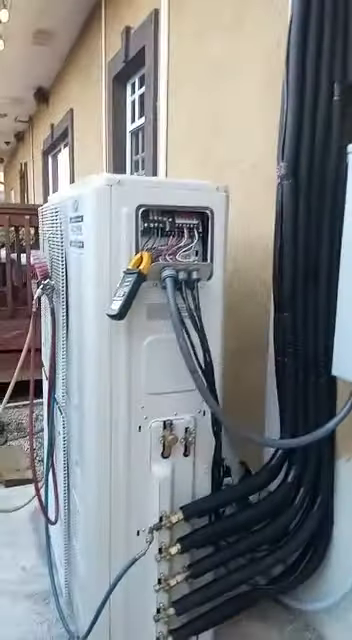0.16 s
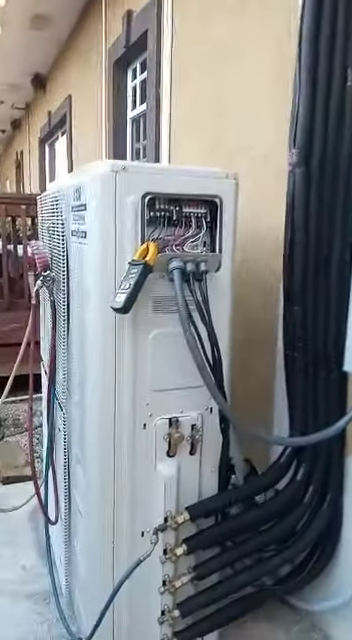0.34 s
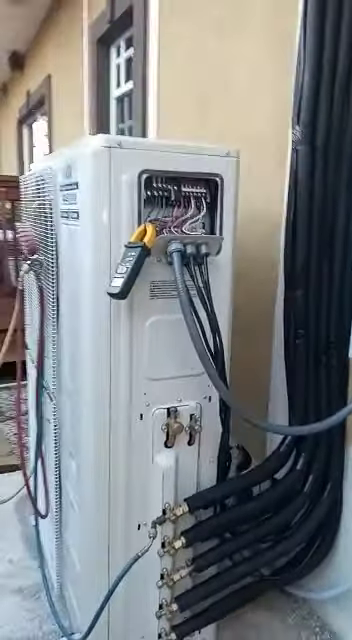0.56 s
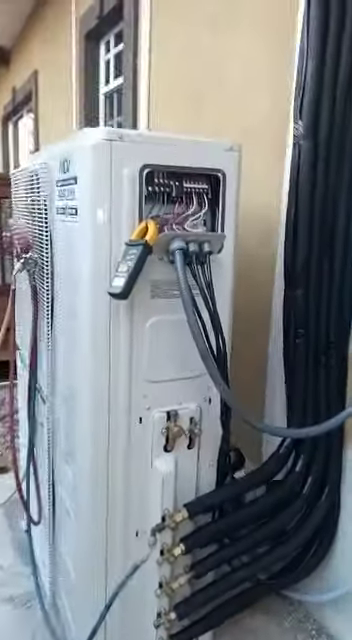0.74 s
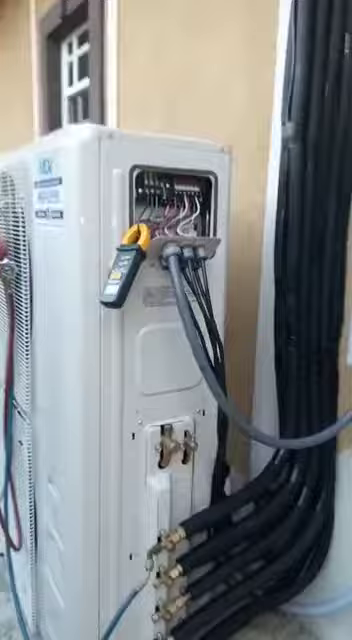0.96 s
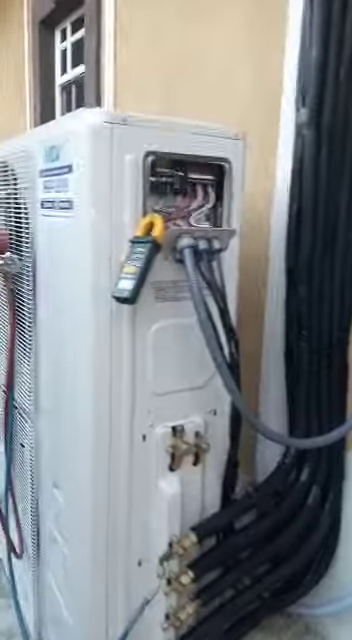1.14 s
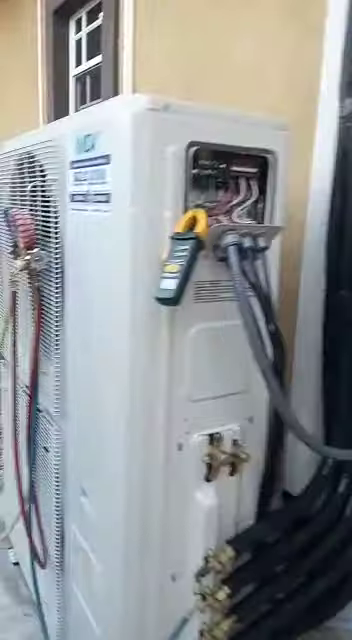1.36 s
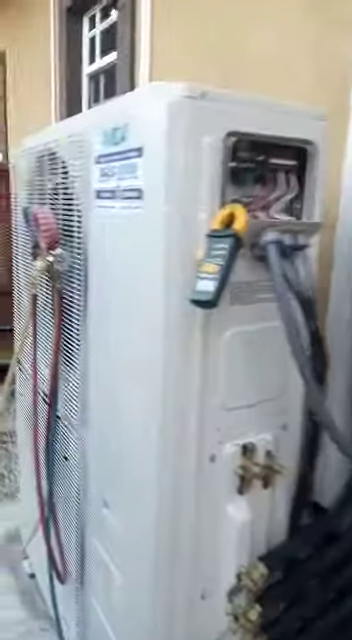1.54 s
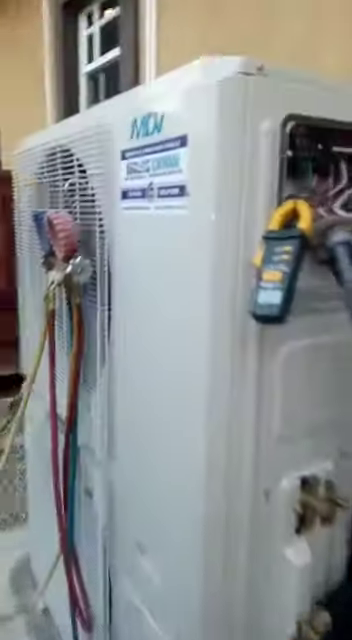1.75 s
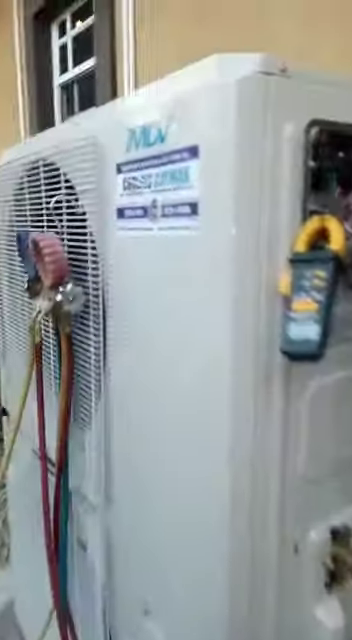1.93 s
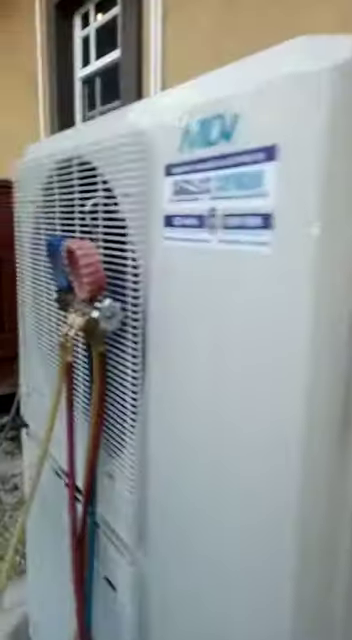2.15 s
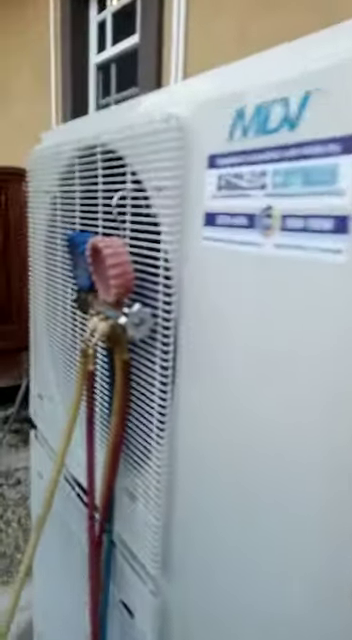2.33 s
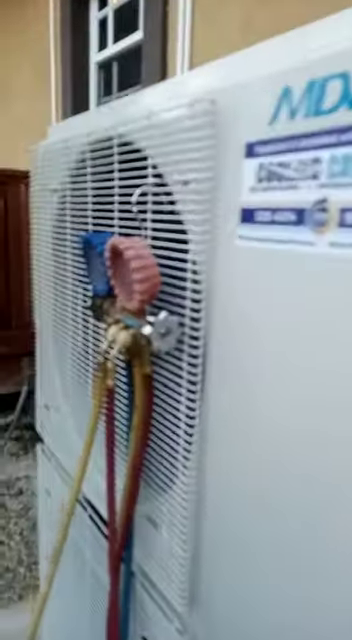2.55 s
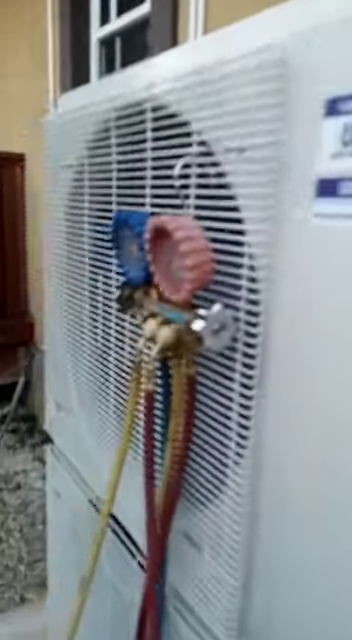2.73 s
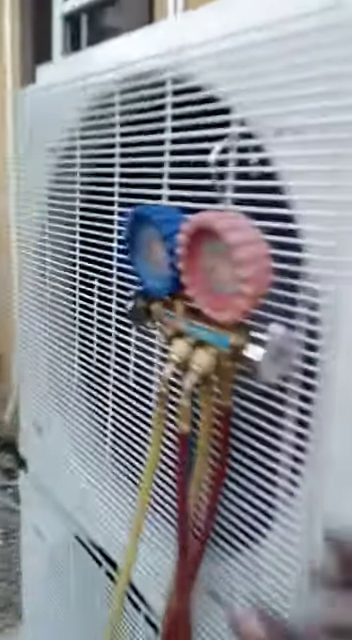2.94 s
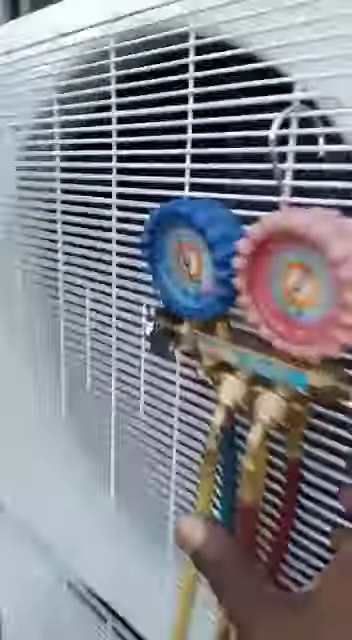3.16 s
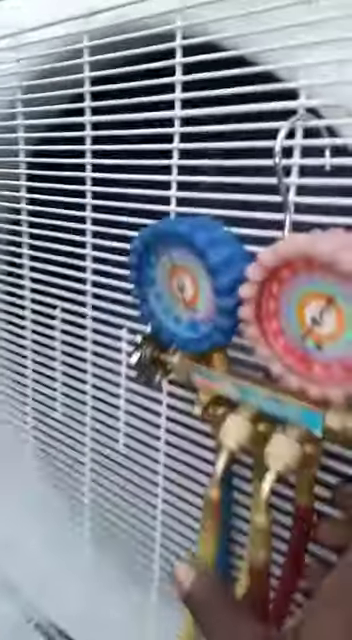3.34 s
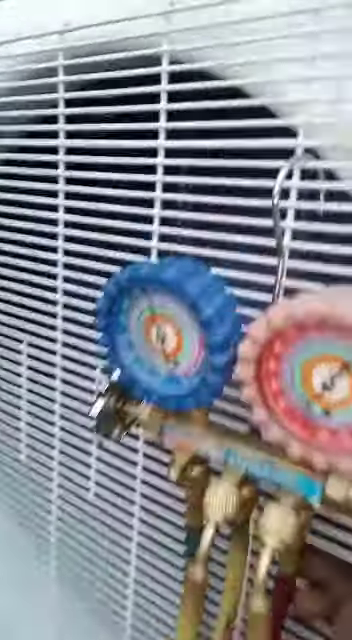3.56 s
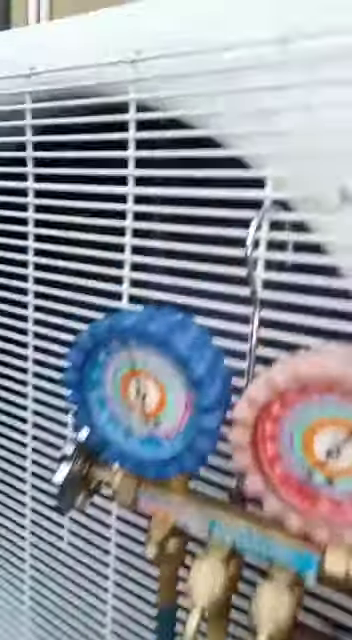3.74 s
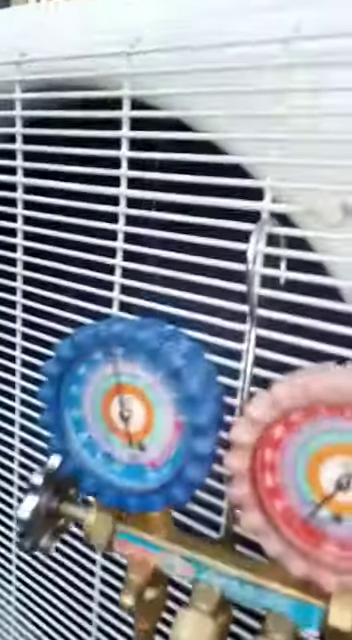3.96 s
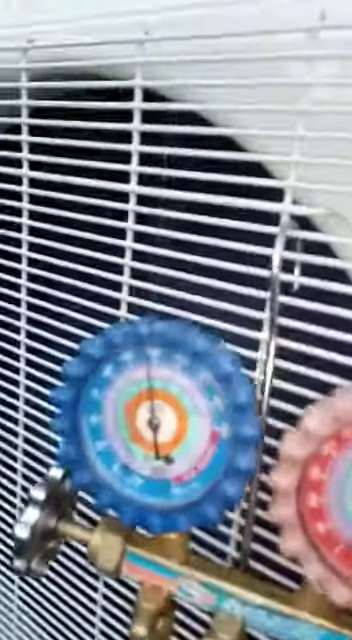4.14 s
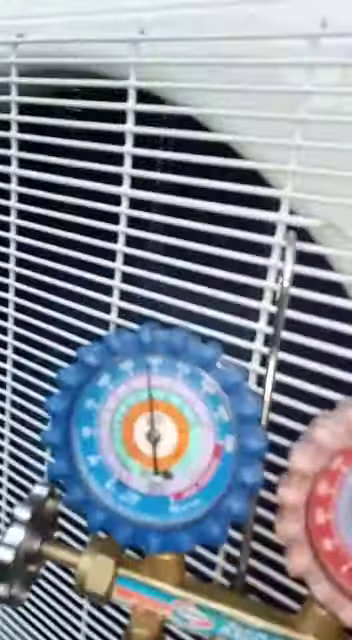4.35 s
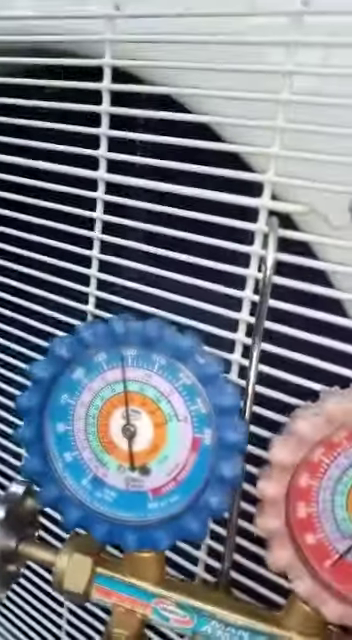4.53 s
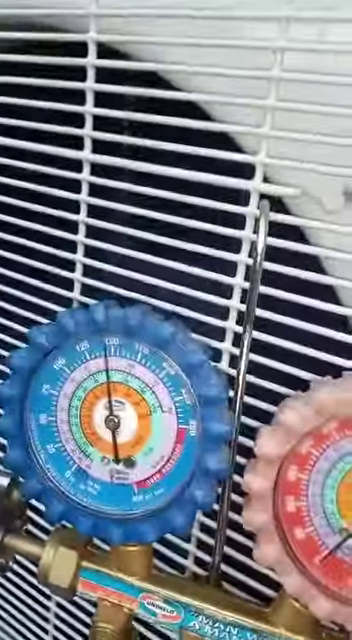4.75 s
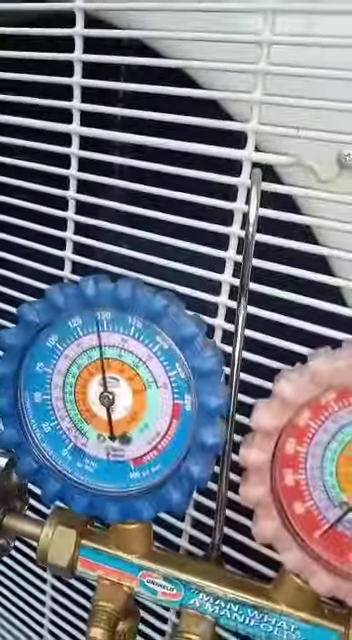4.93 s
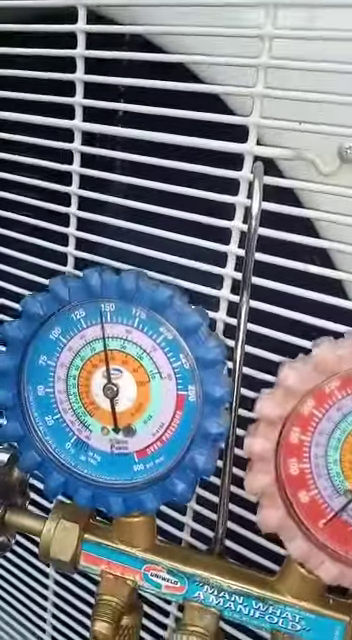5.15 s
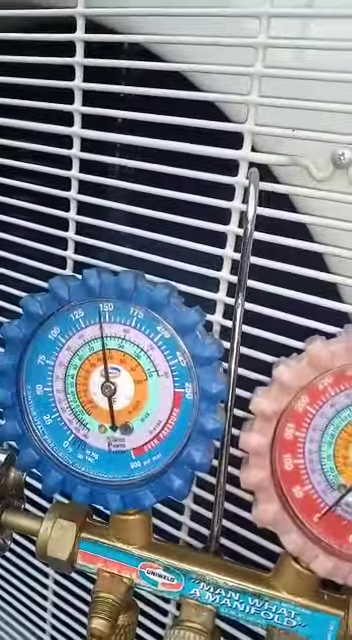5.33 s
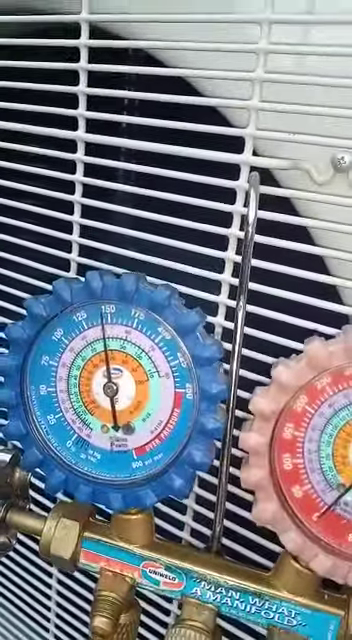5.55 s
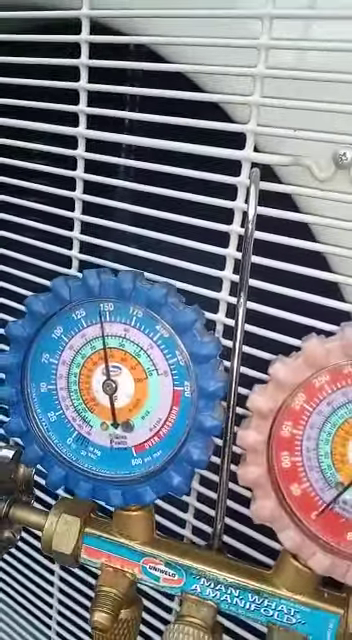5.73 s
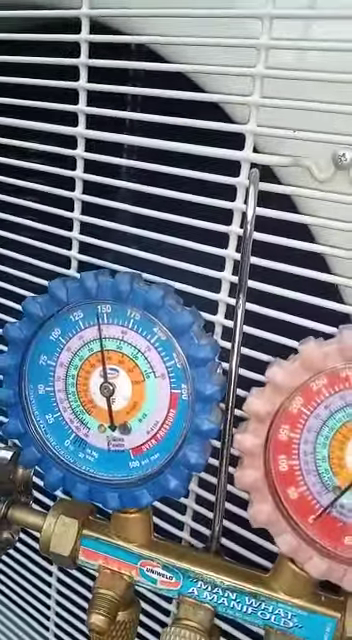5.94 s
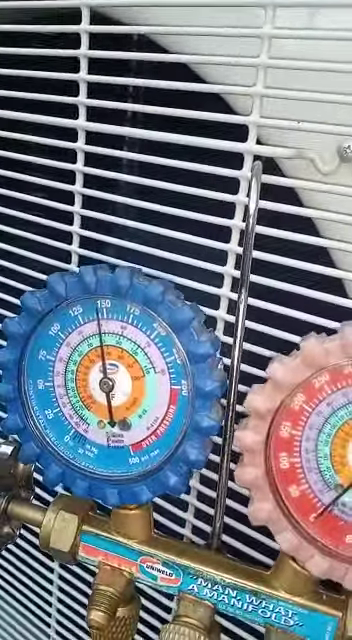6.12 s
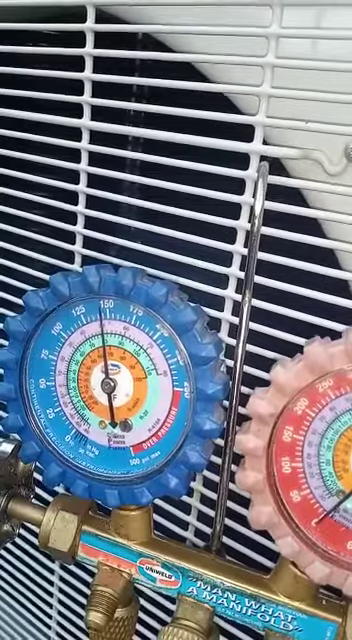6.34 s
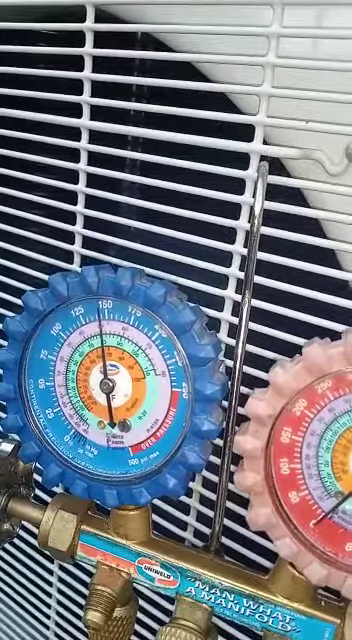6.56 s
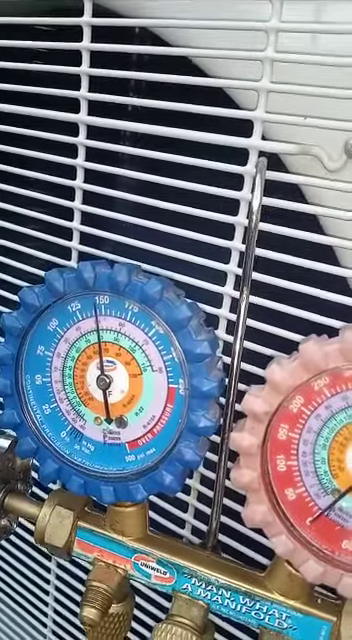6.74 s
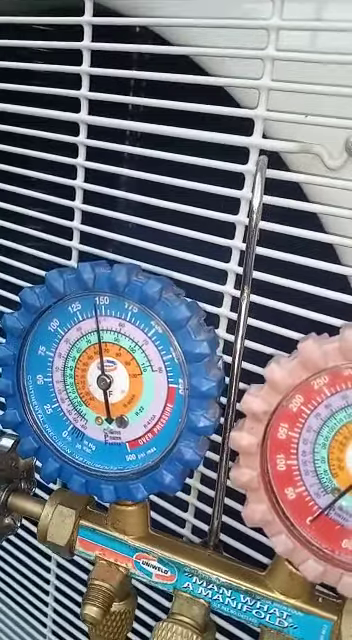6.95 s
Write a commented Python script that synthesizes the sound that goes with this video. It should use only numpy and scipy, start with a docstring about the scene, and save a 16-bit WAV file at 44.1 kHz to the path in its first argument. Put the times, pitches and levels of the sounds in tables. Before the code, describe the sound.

An outdoor air conditioner hums and hisses steadily, then its fan outflow buffets the microphone with rumbling, thumping gusts as it comes close.

```python
"""The outdoor unit of an air conditioner runs steadily while a two-port hand-held microphone walks up to its fan.
Casing hiss and a whine band are filtered noise; compressor orders, fan tones and whistle are fading sines.
In the outflow, eddies buffet each port on its own: a frozen noise pattern is swept past at the air's speed.
A gain control ducks the machine under the gusts."""
import sys
import numpy as np
from scipy import signal
from scipy.fft import rfft, irfft, next_fast_len
from scipy.io import wavfile
from scipy.ndimage import uniform_filter1d, map_coordinates

SR = 44100
rng = np.random.default_rng(int(sys.argv[2]) if len(sys.argv) > 2 else 0)


def master(y):
    """Save y as 16-bit WAV."""
    cut = np.clip(np.atleast_2d(y).T, -1, 1)
    pcm = np.round(cut * 32767)  # scale
    wavfile.write(sys.argv[1], SR, pcm.astype(np.int16))


def boost(x):
    """Linear amplitude factor 10**(x/20) for a level x in decibels (scalar or array-like)."""
    u = np.asarray(x, float) / 20
    return 10 ** u


N = 308259  # length [samples]


def evened(x):
    """Normalization: divides a signal by its root-mean-square value."""
    return x / np.sqrt(np.mean(x ** 2) + 1e-20)


def read(points, hz):
    """Spectral interpolation: reads a table against the logarithm of frequency."""
    f, value = np.transpose(points)
    return np.interp(np.log(hz + 1), np.log(f + 1), value)


def curves(rows):
    """Envelope interpolation: turns each column of a timed table into one value a sample."""
    s, *columns = np.transpose(rows)
    return [np.interp(np.arange(N) / SR, s, column) for column in columns]


def wander(low_hz, top_hz):
    """Superposition: log-spaced sines of random phase add up to a slow fluctuation of rms 1."""
    t = np.arange(0, N + 64, 64) / SR
    slow = sum(np.sin(2 * np.pi * (f * t + rng.random())) for f in np.geomspace(low_hz, top_hz, num=24))
    return np.interp(np.arange(N) / SR, t, evened(slow))


def low_cut(x):
    """High-pass response: the ports lose the deep bass."""
    return signal.sosfilt(signal.butter(4, 92.3, "high", fs=SR, output="sos"), x)


def patchy_noise(gain, patchy_db):
    """Partial coherence: two noises share a part at each frequency, under drifting spectral patches."""
    # likeness of the ports apart from the lag: (frequency [Hz], coherence [0-1])
    alike = [(60, 0), (300, 1), (800, 0.4), (1500, 0), (4000, 0.52), (15000, 0.3)]
    frames, hz = N // 512 + 5, np.fft.rfftfreq(2048, 1 / SR)
    a, b, c, d, patches = rng.standard_normal((frames, 1025, 5)).T
    patches = uniform_filter1d(patches, size=8, axis=0)  # along frequency
    patches = evened(uniform_filter1d(patches, size=20, axis=1))  # along time
    same = np.clip(read(alike, hz), 0, 1)[:, None]
    left, other = a + 1j * b, c + 1j * d
    spectra = np.array([left, same * left + np.sqrt(1 - same ** 2) * other])
    spectra *= gain(hz)[:, None] * boost(patchy_db * patches)
    return evened(signal.istft(spectra, nperseg=2048, noverlap=1536)[1][:, :N])


def unit():
    """Diffraction and path delay: the machine is shaded at the right port and late at the left."""
    # the right port faces away from the unit: (frequency [Hz], attenuation at the right port [dB])
    shade = [(60, 17), (200, 2.5), (700, 2.5), (1300, 7), (2400, 11.5), (5500, 13.5), (6800, 16),
             (8400, 34), (9600, 3), (11500, 3), (14000, -6), (15700, 10)]
    lag_s = 0.000755
    size = next_fast_len(N)
    hz = np.fft.rfftfreq(size, 1 / SR)
    ports = np.array([np.exp(-2j * np.pi * hz * lag_s), boost(-read(shade, hz))])
    machine = casing_hiss() + whine() + tones()
    return low_cut(irfft(rfft(machine, size) * ports, size)[:, :N])


def casing_hiss():
    """Broadband flow noise: airflow and casing hiss, its top dulling as the ports turn to the grille."""
    # relative spectrum of the hiss: (frequency [Hz], spectral density [dB])
    hiss_shape = [(60, -4), (150, -3), (300, -9), (600, -12), (1050, -14), (1500, -11), (2000, -16),
                  (4300, -17), (5600, -21), (9300, -24), (12400, -28), (13800, -45), (14900, -23),
                  (15700, -25)]
    # gain of the top band: (time [s], gain [dB])
    dulling = [(0, -1), (2.5, 0.5), (3.6, -5.5), (6.99, -5)]
    hiss = boost(-25) * patchy_noise(lambda hz: boost(read(hiss_shape, hz)), patchy_db=1.0)
    band = signal.butter(2, [9000, 13800], "band", fs=SR, output="sos")
    top = signal.sosfiltfilt(band, hiss)
    return hiss + top * (boost(curves(dulling)[0]) - 1)


def whine():
    """Band-limited noise: the compressor drive hisses in a cluster of spectral humps."""
    # humps of the whine ahead of its gain curve: (centre [Hz], width [Hz], rms level [dB])
    hump_rows = [(6167, 230, -34.5), (6420, 26, -35), (6620, 510, -32), (6926, 48, -35.5), (7180, 460, -29),
                 (7425, 610, -34.5)]
    # the whine is loudest at the corner of the unit: (time [s], gain [dB])
    whine_gain = [(0, -2), (2.0, 3), (3.2, -3), (6.99, -3)]

    def humps(hz):
        power = sum(boost(2 * db) / w / (1 + (2 * (hz - f) / w) ** 4) for f, w, db in hump_rows)
        return np.sqrt(power)

    total = np.sqrt(sum(boost(2 * db) for f, w, db in hump_rows))
    return total * patchy_noise(humps, patchy_db=3.5) * boost(curves(whine_gain)[0])


def tones():
    """Harmonic orders of rotation: compressor shaft orders, the fan's tones and its drive's whistle."""
    # compressor orders, ahead of crests and fades: (multiple of the shaft rate [1], rms level [dB])
    orders = [(4, -47), (6, -51), (9, -45), (10, -49), (11, -54), (13, -54), (17, -52), (19, -45),
              (20, -48), (21, -45), (23, -51), (36, -54), (37, -55), (40, -53), (42, -54), (44, -54),
              (47, -57), (50, -57), (55, -56), (73, -53), (79, -45), (82, -49), (85, -42), (97, -46)]
    # fan blade-pass tones, ahead of the approach gain and fades: (frequency [Hz], rms level [dB])
    fan_tones = [(80, -41), (119, -36), (160, -33), (200, -44)]
    # growth of the fan's tones on the way to the grille: (time [s], gain [dB])
    fan_near = [(0, -5), (.9, -6.5), (1.3, 0.5), (2.5, 1.5), (6.99, 2)]
    # the fan drive's thin top whistle: (frequency [Hz], ..)
    whistle_hz = (14891, 14998, 15104)
    # each whistle line ahead of fades, clearer in front of the grille: (time [s], rms level [dB])
    whistle = [(0, -66), (3.6, -62), (4.2, -54), (5.5, -55), (6.99, -60)]
    shaft_hz = 76.01
    tremor = np.array([wander(0.306, 9) for port in range(2)])
    whistle_db = curves(whistle)[0]
    near_db = curves(fan_near)[0]
    out = sum(tone(k * shaft_hz, order_db(k, db), 1.5, tremor) for k, db in orders)
    out += sum(tone(hz, whistle_db, 3, tremor) for hz in whistle_hz)
    return out + sum(tone(hz, db + near_db, 1.8, tremor) for hz, db in fan_tones)


def order_db(k, db):
    """Standing waves beside the wall: an order swells as the listener walks through a crest."""
    # crests, added by power: (shaft multiple [1], time [s], 1/e half-width [s], rms level [dB])
    crest_rows = [(9, .45, .35, -41), (23, .45, .5, -42), (19, 1.0, .22, -36), (10, 1.1, .45, -44),
                  (4, 1.9, .9, -41), (50, 1.75, .15, -44), (55, 2.0, .3, -47), (19, 2.9, .3, -39),
                  (9, 2.0, .35, -42), (19, 2.05, .35, -35), (44, 2.1, .3, -39), (21, 2.25, .35, -40),
                  (23, 2.15, .25, -46), (21, 3.1, .25, -38), (19, 5.0, .2, -36), (19, 5.5, .12, -39)]
    t = np.arange(N) / SR
    crests = sum(boost(2 * top_db) * np.exp(-((t - s) / width) ** 2)
                 for at, s, width, top_db in crest_rows if at == k)
    return 10 * np.log10(boost(2 * db) + crests)


def tone(hz, db, fade_db, tremor):
    """Amplitude and phase modulation: a sine fades at each port; hand tremor shakes high tones' phase most."""
    cycles = hz * np.arange(N) / SR + rng.random((2, 1))
    phase = 2 * np.pi * cycles + min(hz / 2500, .75) * tremor
    # the right port is 3.5 dB weaker
    fades_db = np.array([db - 3.5 * port + fade_db * wander(0.168, 6) for port in range(2)])
    return boost(fades_db) * np.sqrt(2) * np.sin(phase)


def buffet(port, breeze_db, eddy_m=0.011, gusty=.4, lumpy_db=4.0):
    """Frozen turbulence: an eddy pattern is swept past the port, so quicker air sounds brighter."""
    level_db, speed, gusting = air(port, breeze_db)
    surge, lull_db, swings = bursts(port, level_db, speed, gusting)
    gust = 1.8 * np.tanh(wander(8, 110) / 1.6)
    metres = np.cumsum(speed * np.exp(gusty * gust + .5 * surge)) / SR
    step_m = .0004
    count = int(metres[-1] / step_m) + 9
    per_m = np.fft.rfftfreq(count, step_m) + 0.00075
    # big eddies are strong, those under the smallest size are smoothed away
    sizes = per_m ** -.6 / (1 + (per_m * eddy_m) ** 2.46)
    pattern = irfft(rfft(rng.standard_normal(count)) * sizes, count)
    swept = low_cut(map_coordinates(pattern, [metres / step_m], order=3))
    # divide out the running rms, then set the level anew
    steady = swept / np.sqrt(uniform_filter1d(swept ** 2, size=5000) + 1e-20)
    lumps = evened(boost(lumpy_db * (0.16 * gust + 0.88 * wander(5, 35))))
    return boost(level_db + lull_db) * steady * lumps + .7 * low_cut(swings)


def air(port, breeze_db):
    """Power addition: gusts add to a restless breeze, and the air speed is their power-weighted mean."""
    # gusts of outflow that sweep one port:
    # (start [s], time from start to fall [s], port, level [dB], air speed ahead of fluctuation [m/s])
    gust_rows = [(.09, .05, "right", -35, 1.0), (0.232, 0.16, "right", -35, 1.13),
                 (0.573, 0.048, "right", -33, 1.0), (1.65, 0.15, "left", -30, 1.23),
                 (2.14, 0.081, "left", -29, 1.03), (2.659, 0.097, "right", -4, 1.99),
                 (2.779, 0.17, "left", -9, 1.75), (2.84, 0.094, "right", -6, 1.59),
                 (2.998, 0.3, "left", -8, 2.3), (3.079, 0.082, "right", -8, 1.4),
                 (3.389, .27, "left", -5.5, 1.94), (3.53, 0.28, "right", -5, 3.55),
                 (3.78, 0.082, "left", -7, 1.41), (3.899, 0.17, "right", -9.5, 3.03),
                 (4.3, 0.33, "left", -11, 1.495), (4.698, 0.1, "right", -6, 4.9),
                 (4.998, 0.26, "right", -7, 3.53), (5.31, .28, "right", -8, 2.9),
                 (5.42, 0.23, "left", -13.5, 1.63), (5.608, .22, "right", -2, 4.77),
                 (5.831, .16, "left", -12, 1.8), (5.928, .04, "right", -5.5, 2.2),
                 (6.0, 0.077, "right", -3, 4.6), (6.08, 0.19, "left", -11.5, 2.23),
                 (6.172, .06, "right", -6.5, 2.48), (6.301, 0.058, "right", -5, 3.07),
                 (6.408, .26, "right", -3, 4.2), (6.73, 0.23, "left", -7.5, 2.2),
                 (6.856, .13, "right", -9.5, 4.86)]
    rise_s, fall_s = .015, .03
    t = np.arange(N) / SR
    breeze = boost(2 * (breeze_db + 1.21 * wander(2.5, 9)))
    # 1.8 m/s at -15 dB and 0.14 m/s more for each dB, at least 0.5 m/s
    breeze_speed = np.maximum(1.8 + 0.14 * (breeze_db + 15), .5)
    gusts, moved = np.zeros(N), breeze * breeze_speed
    for s, length, at_port, db, speed in gust_rows:
        if at_port == port:
            ramp = np.minimum((t - s) / rise_s, (s + length - t) / fall_s + 1).clip(0, 1)
            power = boost(2 * db) * ramp ** 2
            gusts = gusts + power
            moved = moved + power * speed
    return 10 * np.log10(breeze + gusts), moved / (breeze + gusts), gusts > breeze


def bursts(port, level_db, speed, gusting):
    """Impulsive pressure: each knock is a surge of air speed, a level change ahead and one pressure swing."""
    # the sharpest knocks of air; the swing is later scaled and low-cut, a positive change is a swell:
    # (time [s], port, relative swing level [dB], relative level change just before [dB])
    pops = [(3.051, "left", -2, -4), (3.254, "left", 7, -1), (3.281, "left", 6, 0), (3.47, "left", 6, -4.5),
            (3.537, "right", 1, -1), (3.641, "right", 4.5, -5), (3.722, "right", 5.5, 1),
            (3.766, "right", 9, -6), (4.039, "right", 6.5, -3), (4.335, "left", 3.5, -2.5),
            (4.717, "right", 10.5, -5), (4.778, "right", 5, -7), (5.185, "right", 2.5, -2.5),
            (5.25, "right", -3, 2), (5.517, "right", 3, -4), (5.618, "right", 5.5, -6),
            (5.651, "right", 12, 1.5), (5.712, "right", 14, 1), (5.769, "right", 2.5, -1.5),
            (5.818, "right", -3, -0.5), (6.0, "right", 5, -11), (6.062, "right", 12.5, -11),
            (6.305, "right", 4, 1), (6.365, "right", 5, 2.5), (6.411, "right", 14, -13),
            (6.484, "right", 12, -4), (6.507, "right", 7, 3.5), (6.544, "right", 7.5, 1),
            (6.641, "right", 7.5, -2), (6.741, "left", 6, -5.5), (6.76, "left", 5, -0.5),
            (6.88, "right", 9.5, -3)]
    knocks_per_s, knock_over_db = 4, 5  # small random knocks inside gusts
    surge, lull_db, swings = np.zeros(N), np.zeros(N), np.zeros(N)
    t = np.arange(N) / SR
    small = np.flatnonzero((rng.random(N) < knocks_per_s / SR) & gusting & (t < t[-2300]))
    knocks = pops + [(t[i], port, level_db[i] + knock_over_db, 0) for i in small]
    chance = rng.random((200, 2))
    for (s, at_port, db, before_db), (pitch, side) in zip(knocks, chance):
        if at_port == port:
            centre = round(s * SR)
            near = slice(centre - 2200, centre + 2200)
            u = t[near] - s
            surge[near] += (u > -.002) * np.exp(-abs(u) / .008)
            # a 42 ms trapezoid with a plateau of 1.11 times before_db
            lull_db[near] += before_db * np.minimum(-u - .002, u + 0.0444).clip(0, .004) / 0.0036
            # quicker air makes a shorter swing
            turns = (u - .0015) * (300 + 90 * pitch) * speed[centre] ** .33
            swing = np.cos(2 * np.pi * turns) * np.exp(-(turns / 0.49) ** 2)
            swings[near] += boost(db) * np.sign(side - .5) * swing
    return surge, lull_db, swings


def scene():
    """Superposition: the unit's sound adds to the air's pressure on each port."""
    # the breeze, weak beside the unit, strong in the outflow, ahead of its restless fluctuation:
    # (time [s], left level [dB], right level [dB])
    breeze = [(0.0, -46, -46), (1.4, -48, -44), (2.0, -38, -35), (2.5, -27.5, -31), (2.58, -13, -18),
              (3.3, -12, -15), (4.2, -15, -16), (4.8, -14, -26), (5.15, -21, -16), (5.9, -18, -17),
              (6.65, -23.5, -17), (6.99, -18, -16.5)]
    left_db, right_db = curves(breeze)
    return unit() + np.array([buffet("left", left_db), buffet("right", right_db)])


def low_pass(x):
    """Removes everything above the highest recorded frequency."""
    return signal.sosfilt(signal.butter(12, 17070, fs=SR, output="sos"), x)


def record(dry):
    """Dynamic compression: linked gain follows the louder port; a soft ceiling and a low-pass follow."""
    louder = uniform_filter1d(dry ** 2, size=1000, axis=1).max(0)
    power_db = 10 * np.log10(louder.clip(1e-12))
    # the detector rises with the power and falls by at most 176 dB/s
    fall = np.arange(N) * 176.0 / SR
    held_db = np.maximum.accumulate(power_db + fall) - fall
    over_db = np.maximum(held_db + 15.5, 0)  # excess over -15.5 dB
    ducked = dry / boost(0.72 * uniform_filter1d(over_db, size=500))
    ceiling = .86
    limited = ducked / (1 + (ducked / ceiling) ** 6) ** (1 / 6)
    edge = signal.firwin(801, 15780, window=("kaiser", 9), fs=SR)  # low-pass edge [Hz]
    mix = signal.oaconvolve(limited, edge[None], "same")
    return low_pass(mix)


dry = scene()
out = record(dry)
master(out)
```